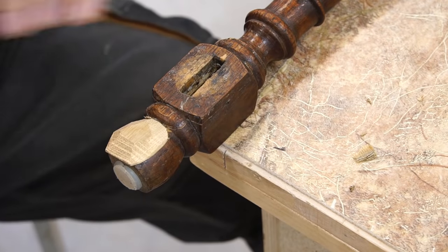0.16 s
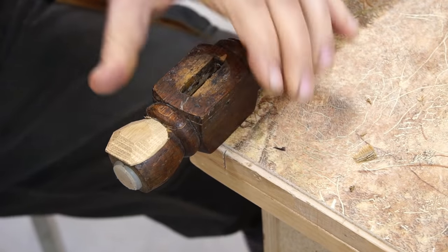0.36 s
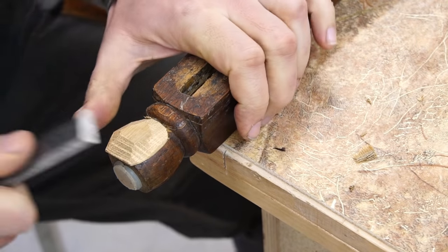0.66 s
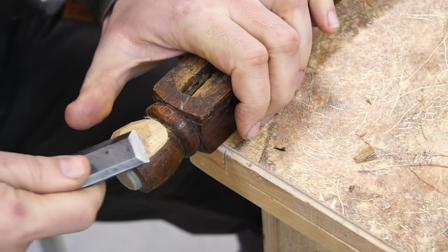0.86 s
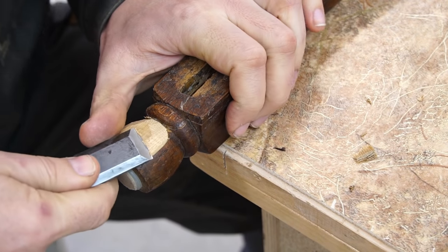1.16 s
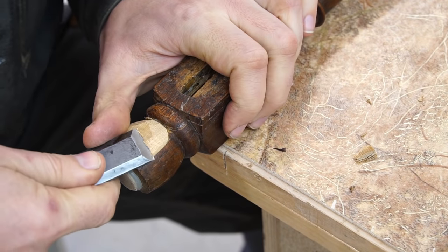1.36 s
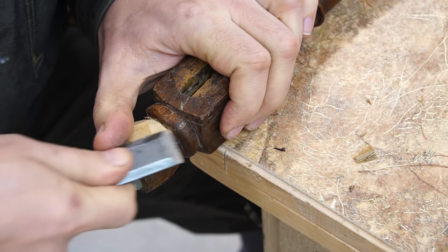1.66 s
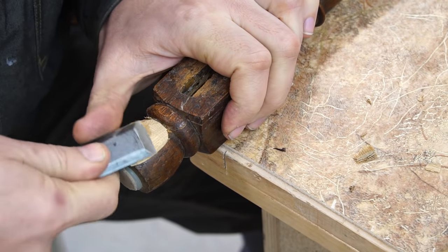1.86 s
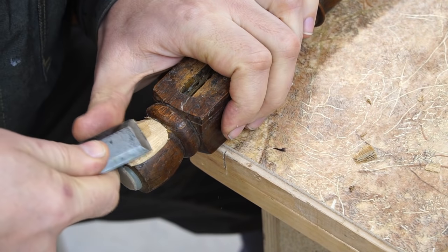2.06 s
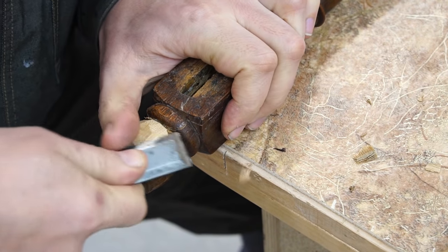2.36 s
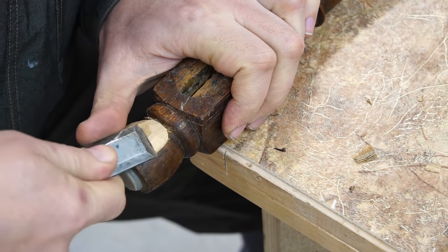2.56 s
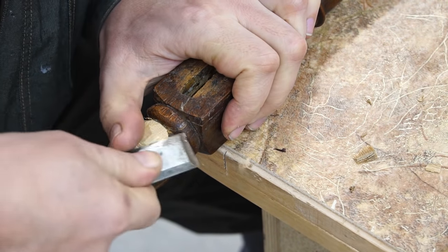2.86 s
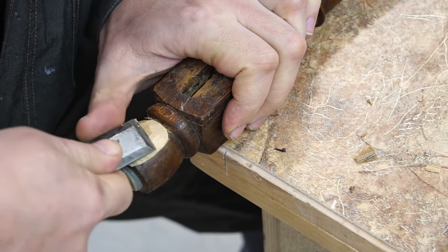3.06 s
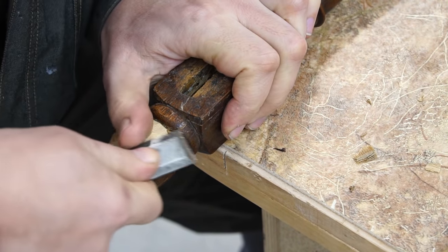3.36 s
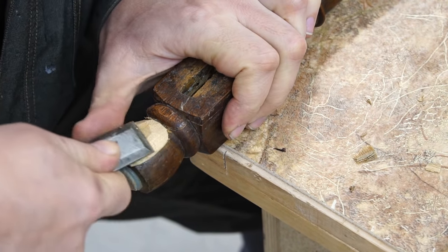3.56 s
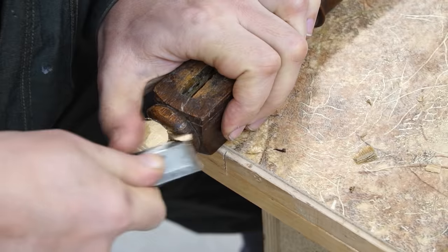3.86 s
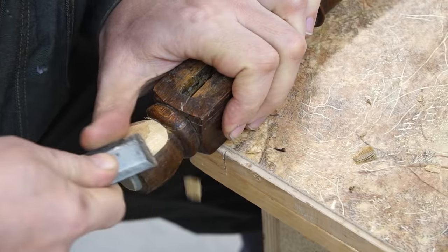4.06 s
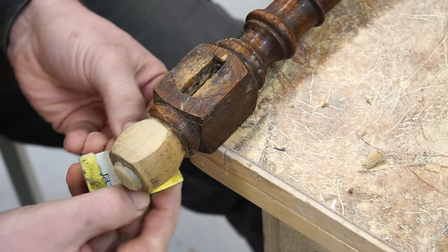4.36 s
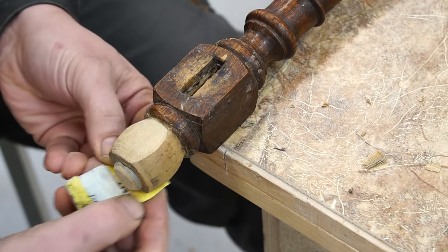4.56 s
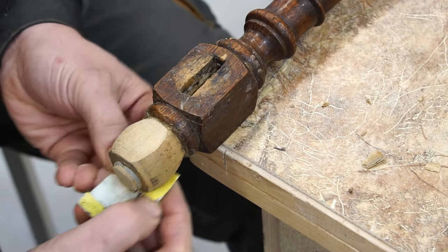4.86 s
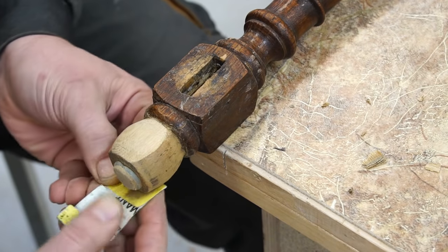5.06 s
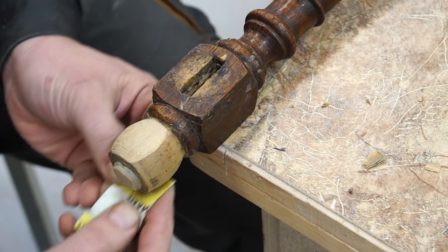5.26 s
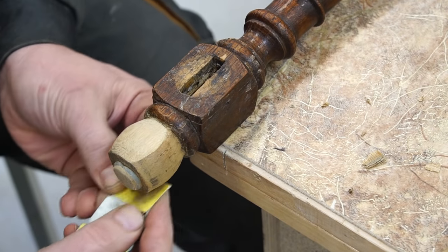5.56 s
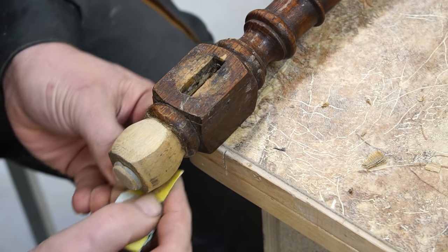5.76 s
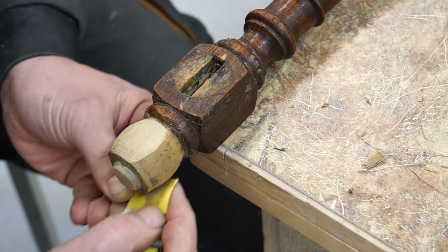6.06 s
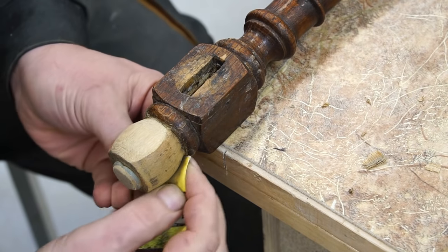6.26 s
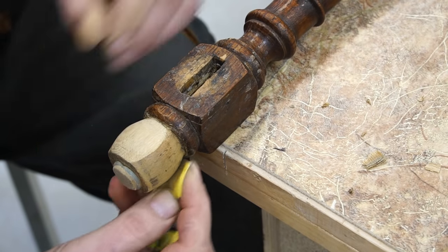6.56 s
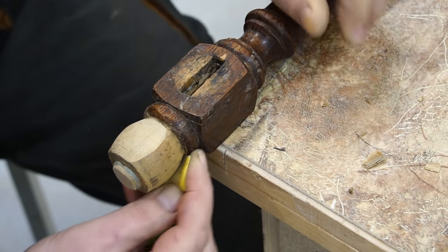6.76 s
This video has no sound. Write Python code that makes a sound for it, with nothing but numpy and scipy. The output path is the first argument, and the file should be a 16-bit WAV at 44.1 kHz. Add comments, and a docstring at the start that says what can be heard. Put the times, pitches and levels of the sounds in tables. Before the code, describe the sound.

A hand slides onto a loose wooden leg, which scuffs and knocks the bench; five crisp chisel pares follow, then quick dry sandpaper strokes.

```python
"""Over quiet workshop air and a faint whine, a hand slides onto a turned chair leg on a bench: a hiss of fine grains.
The loose leg scuffs and taps, then a chisel pares its glued cap in five pushes: torn grains ring wood and steel.
Last, folded sandpaper rubs to and fro: grains follow its speed. Short bright snaps and clicks are quick tones,
knocks are noise bursts through ringing modes, and the bench shudders low. Echoes and a fading tail make the room.
"""
import sys
import numpy as np
from scipy import signal
from scipy.fft import rfft, irfft, next_fast_len
from scipy.io import wavfile
from scipy.ndimage import uniform_filter1d

SR = 44100
rng = np.random.default_rng(int(sys.argv[2]) if len(sys.argv) > 2 else 0)


def waveform_to_disk(signal):
    """Save audio, clipped to [-1, 1], as 16-bit WAV at the path in sys.argv[1]."""
    frames = np.transpose(np.atleast_2d(signal))
    scaled = np.clip(frames, -1, 1) * 32767
    samples = np.round(scaled).astype(np.int16)
    wavfile.write(sys.argv[1], SR, samples)


N = 305613  # length [samples]

# Rise and fall times in these tables are for a change of 20 dB, except the rise of a snap.
# Most colours and all modes set proportions only; the flutter and tail colours also set loudness.
# Hand, leg, chisel and paper are later mixed TRIM_DB lower.

# faint tone that swells and fades: (loudest at [s], rise [s, sign ignored], fall [s], level [dB])
WHINE = (1, -2, 14.5, -67)
# colour of the workshop air: (frequency [Hz], level [dB])
AIR_COLOUR = [(30, -37), (130, -21), (280, -24), (400, -20.5), (520, -11), (1000, -4.5), (1500, -7),
              (2500, -11), (5000, -20), (8000, -22), (11400, -24.5)]
# hand sliding over cloth and wood: (touches at [s], fastest at [s], rise [s], fall [s], level [dB],
# roundness [1-3], centre of the rustle when fastest [Hz], centre one fall time later [Hz])
SLIDES = [(0, -0.007, .1, 0.38, -58, 1.14, 5930, 2680), (0.222, 0.445, 0.24, 0.28, -43.5, 1.94, 2770, 1690),
          (4.135, 4.21, 0.36, 0.67, -49.5, 1.8, 1340, 2960)]
# colour of the wide sliding hiss: (frequency [Hz], level [dB])
SLIDE_COLOUR = [(300, -70), (800, -17.5), (1400, 0.5), (2100, -1), (3000, -1.5), (4000, -4), (6000, -9),
                (9000, -12), (11400, -16)]
# shoves that shake the bench: (time [s], level [dB])
SHAKES = [(.36, -83), (.5, -80), (.78, -79), (.94, -51.5), (1.052, -68), (1.6, -60), (1.7, -51.5),
          (2.12, -62), (2.29, -48.5), (2.83, -52), (3.25, -53), (3.38, -63), (3.82, -45), (4.41, -67),
          (4.672, -57.5), (4.94, -72), (5.53, -66), (5.77, -56.5), (5.98, -65), (6.3, -71), (6.57, -59),
          (6.77, -52), (6.89, -52)]
# low modes of the bench top: (frequency [Hz], width [Hz], level [dB])
BENCH_MODES = [(87, 11, -2), (140.2, 5.6, 0), (214, 41, -8)]
# loose leg shifting under the grip: (strongest at [s], rise [s], fall [s], level [dB], hiss re that level [dB])
SHIFTS = [(.685, 0.022, 0.079, -66, -7), (.84, 0.18, 0.21, -50.5, -12), (0.935, 0.0023, 0.017, -28.5, -46),
          (.99, 0.05, .13, -42.5, -33), (1.085, 0.033, 0.19, -48.5, -12.5)]
# modes of the loose leg: (frequency [Hz], width [Hz], level [dB])
LOOSE_MODES = [(220, 96, -20), (292, 94, -5.5), (383, 27, -5.5), (485, 87, -9.5), (735, 51, -4.5),
               (857, 45, 1), (1043, 82, 8), (1061, 45, 8), (1145, 64, 4.5), (1370, 36, -4),
               (1500, 130, -6.5), (1990, 100, -7.5), (2150, 33, -4.5), (2290, 380, -1.5), (3054, 63, -10.5),
               (3190, 170, -9)]
# loose leg tapping the bench: (time [s], peak [dB])
BUMPS = [(0.932, -28), (0.966, -44), (1.073, -37), (1.443, -57)]
# short bright snaps and clicks of leg, shavings and paper: (time [s], level of the main tone [dB], pitch [Hz],
# overtone [Hz], overtone re main tone [dB], bright crack re main tone [dB], time to the peak [s])
SNAPS = [(1.075, -53, 3260, 5700, -11, -15, 0.00032), (1.443, -52, 2000, 3300, -11, -19, .0004),
         (1.572, -35.5, 2420, 5540, -10, -8, 0.00019), (1.579, -38, 2480, 4300, -7, 2, 0.00045),
         (2.212, -38, 2700, 4700, -10, 2, 0.00026), (2.269, -32, 1960, 3640, 4, -4, 0.00023),
         (4.269, -38, 2540, 6900, -15, -4, 0.00013), (4.559, -21, 2440, 9540, -13, -7.5, 0.00041),
         (4.7779, -39, 2400, 7300, -6, 7, 0.00045), (4.7824, -14.5, 2410, 4170, -5, -10.5, 0.00039),
         (4.882, -28.5, 1780, 2350, -3, -12, 0.00038), (5.829, -38.5, 2430, 5800, 3, 3, 0.00045),
         (5.877, -31.5, 2570, 3480, 0.5, 8, 0.0005), (5.9345, -26, 3430, 1930, -3, -1, 0.00013),
         (5.939, -35, 1880, 2800, -1, -7, 0.0012), (6.057, -39, 4470, 8000, -2, 1, .00023),
         (6.754, -32.5, 2050, 5080, 4.5, 6, 0.0013)]
# chisel pushes, levels before the drives below: (shaving breaks free at [s], jolt [dB], rise of the jolt [s],
# cutting before it [s], cutting [dB], rise of the cut [s], run-out [dB], fall of the run-out [s],
# blade drawn back after [s], drawing back [dB], centre of the rung leg modes under full grip [Hz])
PUSHES = [(1.574, -47, 0.008, .004, -61, 0.008, -57, 0.54, 0.37, -58.5, 650),
          (2.269, -45, 0.011, 0.15, -53.5, 0.017, -48.5, 0.24, 0.21, -76, 595),
          (2.807, -52, 0.016, 0.057, -50.5, 0.037, -53, 0.34, 0.27, -54.5, 646),
          (3.302, -50, 0.013, 0.035, -47.5, 0.048, -51.5, .35, 0.19, -56, 643),
          (3.864, -41.5, 0.064, 0.061, -47, 0.037, -54, 0.57, 0.33, -92, 590)]
# colour of the cutting edge and of the leg's fine hiss: (frequency [Hz], level [dB])
EDGE_COLOUR = [(1200, -75), (2600, 5), (3300, 2.5), (4500, 1), (5700, -2.5), (8000, -5), (10300, -6.5),
               (11400, -11.5)]
# modes of the steel blade: (frequency [Hz], width [Hz], level [dB])
BLADE_MODES = [(2430, 120, -13), (3300, 27, 7), (3310, 62, 9.5), (3660, 29, 5.5), (4320, 40, 6),
               (4640, 160, 2.5), (5700, 100, -26), (5520, 69, 5.5), (7070, 260, 4)]
# modes of the leg on the bench: (frequency [Hz], width [Hz], level [dB])
LEG_MODES = [(219, 61, 1), (365.2, 37, 6), (470, 16, -6.5), (546.3, 32.5, 5.5), (615.4, 15, -2.5),
             (693, 25, 8.5), (753, 122, 6), (882, 61, 8), (1024, 94, 8.5), (1076, 59, 9.5), (1178, 19, 7.5)]
# modes of the leg's small cap: (frequency [Hz], width [Hz], level [dB])
CAP_MODES = [(1366, 29, 0), (1458, 68, 1.5), (1612, 91, 7.5), (1787, 8, 7.5), (2020, 108, 8.5),
             (2111, 75, 10.5), (2190, 190, 13.5), (2568, 78, 7.5), (2714, 440, 7.5), (2710, 140, -10)]
# knocks of the held leg: (time [s], peak [dB], centre of the rung modes [Hz], reach [octaves], chatter [s])
KNOCKS = [(1.578, -44, 2280, 0.49, 0.0054), (1.744, -44.5, 2030, 0.5, .002),
          (2.268, -38.5, 560, 0.077, 0.0038), (2.81, -30.5, 650, 0.14, 0.0066),
          (3.3, -42.5, 620, 0.75, 0.027), (3.864, -35, 360, .06, 0.031), (4.884, -37, 577, .104, 0.012),
          (5.935, -36.5, 536, 0.2, 0.023), (6.87, -41.5, 1080, 0.83, 0.0076)]
# sanding strokes: (start [s], place of top speed [0-1, held to .1-.9], peakedness [held to .2-4],
# grit hiss [dB], cap re hiss [dB], dip at the turn before [dB, scaled for each layer], paper resonance [Hz])
STROKES = [(4.289, 0.6, 2.9, -33.5, -0.5, -11.5, 7400), (4.436, .14, 1.5, -37.5, -5, -8.5, 6940),
           (4.584, 0.46, 2.3, -35, -3.5, -8, 6200), (4.704, 0.19, 1.1, -40.5, -3, -7.5, 3520),
           (4.831, 0.54, 0.38, -39.5, -2.5, -6, 9100), (4.975, 0.33, 0.53, -41, -5, -11, 6900),
           (5.084, 0.7, 1.2, -41.5, -6.5, -4, 6540), (5.244, .29, 0.88, -42.5, -5, -8.5, 8600),
           (5.387, .36, 0.64, -43.5, -2, -7.5, 8140), (5.529, .38, 0.61, -45, -1, -6.5, 5900),
           (5.664, 0.33, 0.56, -43.5, -4, -10.5, 8500), (5.786, 0.5, 0.44, -43.5, -2.5, -10, 6340),
           (5.914, 0.46, .7, -41, -3, -8, 9800), (6.042, 0.58, .89, -44, 0.5, -6.5, 4440),
           (6.159, 0.26, 0.63, -40, -3, -10.5, 4900), (6.322, 0.6, 0.16, -45.5, -2.5, -11, 3940),
           (6.447, 0.18, 0.72, -44, -0.5, -5.5, 5360), (6.577, 0.23, 1.3, -43.5, -5.5, -7.5, 6100),
           (6.689, 0.49, 1.3, -41, -9, -7, 4500), (6.811, .35, 0.78, -39.5, -9.5, -8.5, 5350)]
# colour of the sanding hiss: (frequency [Hz], level [dB])
GRIT_COLOUR = [(1200, -26), (2600, -5.5), (3860, -9.5), (5130, -8), (6900, -9.5), (8700, -9.5),
               (10700, -12.5), (11400, -21.5)]
# treble of the late, fluttering copy: (frequency [Hz], level [dB])
FLUTTER_COLOUR = [(500, -26), (2000, -4.5), (4000, -5.5), (7000, -4.5), (11000, -4)]
# echoes from bench and walls: (delay [s], level [dB])
ECHOES = [(.0021, -13), (.0047, -10), (.0063, -7.5), (0.0092, -21), (0.0188, -16), (.023, -89)]
# how long the room tail takes to fade by 60 dB: (frequency [Hz], time [s])
FADE_TIMES = [(150, 0.66), (1000, 0.25), (3000, 0.51), (10000, 0.18)]
# room tail compared with direct sound: (frequency [Hz], level [dB])
TAIL_COLOUR = [(100, 6.5), (500, 3), (2000, -6), (6000, -5), (11000, -33)]
# likeness of the tail in the two channels: (frequency [Hz], likeness [0-1])
LIKENESS = [(60, 0.6), (170, 0.85), (500, 0.91), (1400, 0.7), (4000, 0), (11000, .05)]
# left minus right while paring: (frequency [Hz], difference [dB])
LEAN_CHISEL = [(60, 12), (170, 2.5), (500, -1.5), (1420, -2.5), (4090, -2.5), (11800, 1)]
# left minus right while sanding: (frequency [Hz], difference [dB])
LEAN_PAPER = [(60, -0.5), (170, 0.5), (500, -1.5), (1420, -3.5), (4090, -0.5), (11800, 1.0)]

TRIM_DB = -3
AIR_DB, WHINE_HZ = -62, 1210
TOUCH_S = 0.019  # how long the hand takes to make contact
WIDENING = 0.12  # the wide hiss follows the speed more steeply than the rustle
SHAKE_RISE_S, SHAKE_FALL_S = 0.091, 0.22
BITE_S, JOLT_FALL_S, DRAW_S = 0.067, 0.047, 0.14  # times for a change of 20 dB
# how strongly each stage drives each layer: (biting [dB], cutting [dB], jolt [dB], run-out [dB], drawing back [dB])
DRIVE_CAP = (-6.5, 6, -0.7, 5, 2.3)
DRIVE_EDGE = (-8.5, -6.5, -5, -0.5, -7.5)
DRIVE_LEG = (-19, 3, -8, 3, -12.5)
DRIVE_STEEL = (-10.5, -6, -10, -20, -7)
REST_HZ, GRIP_S, RELAX_S = 954, 0.22, 0.66  # a firmer grip lowers the centre of the rung leg modes
OTHER_MODES_DB = -21.5  # what a knock adds to every mode, near or far
USUAL_DB = -42  # hiss of a usual stroke
SANDED_LEG_DB, LEG_PER_DB, SANDED_LEG_HZ = -52.5, 0.52, 824  # the leg follows the strokes only in part
PAPER_DB, PAPER_DB_PER_OCTAVE = -9.5, -6.5  # paper resonance at 6 kHz; weaker when higher
LOW_CUT_HZ, TOP_HZ = 227, 11080


def amp(db):
    """Turns decibels into a gain."""
    return 10 ** (np.asarray(db) / 20)


def evened(x):
    """Scales a sound to an average (rms) strength of 1."""
    return x / np.sqrt(np.mean(x ** 2) + 1e-20)


def read(points, hz):
    """Reads a curve between its points, on a logarithmic frequency scale."""
    f, value = np.transpose(points)
    return np.interp(np.log(hz + 1), np.log(f + 1), value)


def add(mix, s, sound):
    """Adds a short sound to the mix, starting at s seconds."""
    part = mix[round(s * SR):][:len(sound)]
    part += sound[:len(part)]


def shaped(x, points, share=1):
    """Filters a sound by a colour in dB, multiplied by share."""
    size = next_fast_len(x.shape[-1])
    gain = amp(share * read(points, np.fft.rfftfreq(size, 1 / SR)))
    return irfft(rfft(x, size) * gain, size)[..., :x.shape[-1]]


def swell(top, rise, fall, db, bend=1.):
    """Gain over time: db at top, 20 dB less rise s before and fall s after; bend 1 is pointed, 2 is round."""
    t = np.arange(N) / SR - top
    return amp(db - 20 * np.where(t < 0, -t / abs(rise), t / abs(fall)) ** bend)


def ring(modes, weights=1):
    """The answer of each mode to one tap, neighbours in opposite phase; energy 1 in all."""
    hz, width, db = np.transpose(modes)[..., None]
    t = np.arange(4096) / SR
    sign = (-1.) ** np.arange(len(modes))[:, None]
    decay = np.exp(-np.pi * width * t)  # wide modes die sooner
    out = sign * weights * amp(db) * np.sqrt(width) * decay * np.sin(2 * np.pi * hz * t)
    return out / np.linalg.norm(out)


def near(hz, centre_hz, reach, rest_db):
    """Weight of a mode at hz when the wood is touched where it favours centre_hz."""
    return np.exp(-.5 * (np.log2(hz / centre_hz) / reach) ** 2) + amp(rest_db)


def resonate(x, hz, width):
    """A moving resonance: shifts the curve hz down to zero, smooths twice and shifts back; rms 1."""
    turn = np.exp(2j * np.pi * np.cumsum(hz) / SR)
    r = np.exp(-np.pi * width / SR)
    smooth = signal.lfilter([1], [1, -2 * r, r * r], x / turn)
    return evened((turn * smooth).real)


def grains(per_s, spread_db, clump_db):
    """Fibres tearing or surfaces rubbing: random clicks of uneven size, in clumps of a few ms."""
    clumps = amp(clump_db * evened(uniform_filter1d(rng.standard_normal(N), size=200)))
    size = amp(spread_db * np.minimum(rng.exponential(1, N), 5)) * rng.standard_normal(N)
    return evened(clumps * size * (rng.random(N) < per_s / SR))


def floor():
    """Quiet workshop air, partly alike left and right, and a faint whine that swells and fades."""
    a, b = rng.standard_normal((2, N))
    air = amp(AIR_DB) * evened(shaped(np.array([a, 0.13 * a + 0.84 * b]), AIR_COLOUR))
    whine = np.sqrt(2) * np.sin(2 * np.pi * WHINE_HZ * np.arange(N) / SR)
    return air + swell(*WHINE, bend=1.2) * whine


def hand():
    """Skin and sleeve dragging: a smooth, fine hiss and a rustle whose centre drifts."""
    drag, t = grains(per_s=25000, spread_db=-2.3, clump_db=-1.0), np.arange(N) / SR
    glide = []
    for _, top, _, fall, _, _, hz, end_hz in SLIDES:
        glide += [(top, hz), (top + fall, end_hz)]
    wide = evened(shaped(drag, SLIDE_COLOUR))
    # the same grains backwards, so the rustle is a separate noise
    rustle = amp(-6.0) * resonate(drag[::-1], np.interp(t, *np.transpose(glide)), width=590)
    out = np.zeros(N)
    for touch, top, rise, fall, db, bend, _, _ in SLIDES:
        speed = swell(top, rise, fall, 0, bend)
        contact = np.clip((t - touch) / TOUCH_S + .5, 0, 1)
        out += contact * amp(db) * speed * (speed ** WIDENING * wide + rustle)
    return out


def bench():
    """Low uneven shudder of the bench top: sparse clicks ring its modes at each shove."""
    shake = sum(swell(s, SHAKE_RISE_S, SHAKE_FALL_S, db) for s, db in SHAKES)
    clicks = grains(per_s=93, spread_db=-6.5, clump_db=3.5)
    return signal.oaconvolve(shake * clicks, ring(BENCH_MODES).sum(0))[:N]


def loose_leg():
    """The leg scuffs and taps the bench while the hand takes hold; both ring its loose modes."""
    scuff = grains(per_s=3400, spread_db=0.5, clump_db=-2.5)
    moves = np.array([swell(*row[:4], bend=1.97) for row in SHIFTS])
    tap = ring(LOOSE_MODES).sum(0)
    out = signal.oaconvolve(moves.sum(0) * scuff, tap)[:N]
    for s, db in BUMPS:
        add(out, s, amp(db) * tap / abs(tap).max())
    hiss_gain = amp(np.array(SHIFTS)[:, 4]) @ moves
    return out + hiss_gain * evened(shaped(scuff[::-1], EDGE_COLOUR))


def snaps():
    """Short bright snaps and clicks: a few quick cycles with an overtone and a bright crack."""
    out, t = np.zeros(N), np.arange(900) / SR
    noises = rng.standard_normal((len(SNAPS), 900))
    for (s, db, hz, over_hz, over_db, crack_db, rise), noise in zip(SNAPS, noises):
        body = np.sin(2 * np.pi * hz * t) + amp(over_db) * np.sin(2 * np.pi * over_hz * t)
        crack = amp(crack_db) * np.diff(noise, prepend=0) / np.sqrt(2)
        add(out, s, amp(db) * (body + crack) * t / rise * np.exp(1 - t / rise))
    return out


def push(free, jolt_db, jolt_rise, cutting, cut_db, rise, run_db, run_out, back, back_db, gripped_hz):
    """The five stages of one push as gains, and how far the grip lowers the leg modes."""
    bite = free - cutting
    biting = swell(bite, 2 * rise, BITE_S, cut_db)
    # rises to the bite, holds until the shaving breaks free, then falls
    held = swell(free, np.inf, JOLT_FALL_S, cut_db)
    cut = np.where(np.arange(N) / SR < bite, swell(bite, rise, 1, cut_db), held)
    jolt = swell(free, jolt_rise, JOLT_FALL_S, jolt_db)
    running_out = swell(free, jolt_rise, run_out, run_db)
    drawing_back = swell(free + back, DRAW_S, DRAW_S, back_db, bend=0.5)
    lowered_hz = (REST_HZ - gripped_hz) * swell(free + 0.027, GRIP_S, RELAX_S, 0, bend=2.73)
    return np.array([biting, cut, jolt, running_out, drawing_back, lowered_hz])


def wood(tear, cap, leg, centre_hz):
    """The tearing rings the cap, and those modes of the leg that the grip leaves free."""
    out = signal.oaconvolve(cap * tear, ring(CAP_MODES).sum(0))[:N]
    for (hz, _, _), mode in zip(LEG_MODES, ring(LEG_MODES)):
        free = near(hz, centre_hz, reach=0.53, rest_db=-6)
        out += signal.oaconvolve(leg * tear * free, mode)[:N]
    # a slim leg radiates little bass
    return signal.sosfilt(signal.butter(2, 240, "high", fs=SR, output="sos"), out)


def chisel():
    """The edge shears the wood while it is pushed: hiss, ringing steel and ringing wood."""
    tear = grains(per_s=9000, spread_db=2.0, clump_db=-0.5)
    *stages, lowered_hz = sum(push(*row) for row in PUSHES)
    drives = (DRIVE_CAP, DRIVE_EDGE, DRIVE_LEG, DRIVE_STEEL)
    cap, edge, leg, blade = (amp(drive) @ np.array(stages) for drive in drives)
    hiss = edge * evened(shaped(tear * rng.choice([-1, 1], N), EDGE_COLOUR))
    steel = signal.oaconvolve(blade * tear[::-1], ring(BLADE_MODES).sum(0))[:N]
    return hiss + steel + wood(tear, cap, leg, np.maximum(REST_HZ - lowered_hz, 200))


def knocks():
    """A blow rings the modes near its centre and chatters on for a moment."""
    out, t = np.zeros(N), np.arange(4096) / SR
    modes = LEG_MODES + CAP_MODES + BLADE_MODES
    mode_hz = np.array(modes)[:, :1]
    noises = rng.standard_normal((len(KNOCKS), 4096))
    for (s, db, centre_hz, reach, chatter), noise in zip(KNOCKS, noises):
        modal = ring(modes, near(mode_hz, centre_hz, reach, OTHER_MODES_DB)).sum(0)
        sound = signal.fftconvolve(noise * np.exp(-t / chatter), modal)
        add(out, s, amp(db) * sound / abs(sound).max())
    return out


def sandpaper():
    """Each stroke speeds up, slows and turns; the hiss follows the speed, the wood less so."""
    start, top, peaked, hiss_db, cap_db, dip_db, paper_hz = np.transpose(STROKES)
    t, turns = np.arange(N) / SR, np.append(start, 6.96)  # the last turn [s]
    k = np.clip(np.searchsorted(turns, t) - 1, 0, len(start) - 1)  # stroke under way
    u = np.clip((t - turns[k]) / np.diff(turns)[k], 0, 1)  # progress through it
    p = np.clip(top[k], .1, .9)
    arc = np.sin(np.pi / 2 * np.where(u < p, u / p, (1 - u) / (1 - p)))
    speed = arc ** np.clip(peaked[k], .2, 4)
    next_dip_db = np.append(dip_db[1:], dip_db[-1])
    dip = np.where(u < p, dip_db[k], next_dip_db[k]) * (1 - speed)
    leg_db = SANDED_LEG_DB + LEG_PER_DB * (hiss_db[k] - USUAL_DB)
    layers = ((hiss_db[k], 1.8), (hiss_db[k] + cap_db[k], 1.5), (leg_db, .9))  # level, share of the dip
    touching = t > turns[0]
    hiss, cap, leg = (uniform_filter1d(touching * amp(db + share * dip), size=300) for db, share in layers)
    tear = grains(per_s=14000, spread_db=1.5, clump_db=0.96)
    grit = evened(shaped(tear * rng.choice([-1, 1], N), GRIT_COLOUR))
    paper_gain = amp(PAPER_DB + PAPER_DB_PER_OCTAVE * np.log2(paper_hz[k] / 6000))
    paper = paper_gain * resonate(tear, paper_hz[k], width=710)
    return hiss * (grit + paper) + wood(tear, cap, leg, SANDED_LEG_HZ)


def fluttering(x):
    """Treble spread wide: a late copy flutters at random in strength and sign, separately left and right."""
    flutter = uniform_filter1d(uniform_filter1d(rng.standard_normal((2, N)), size=150), size=150)
    return evened(flutter) * shaped(np.roll(x, 40), FLUTTER_COLOUR)  # about 1 ms late


def room(x):
    """Single echoes, then sparse taps dying band by band; the bass is more alike in both channels."""
    taps = np.zeros((2, SR))
    at = np.arange(500, SR - 20, 20) + rng.integers(0, 20, (2, (SR - 501) // 20))
    np.put_along_axis(taps, at, rng.choice([-1., 1.], at.shape), 1)
    hz, t, (a, b) = signal.stft(taps, SR, nperseg=256)
    same = np.clip(read(LIKENESS, hz), 0, 1)[:, None]
    fade = amp(-60 * t / read(FADE_TIMES, hz)[:, None])
    z = np.array([a, same * a + np.sqrt(1 - same ** 2) * b]) * fade
    z /= np.sqrt((abs(z) ** 2).sum(2, keepdims=True) if z.ndim < 3 else (abs(z) ** 2).sum(2, keepdims=True))
    tail = signal.istft(z, SR, nperseg=256)[1]
    tail = shaped(tail / np.linalg.norm(tail[0]), TAIL_COLOUR)
    # each echo comes a few samples apart left and right
    for (s, db), skew in zip(ECHOES, rng.integers(-5, 6, (len(ECHOES), 2))):
        tail[[0, 1], round(s * SR) + skew] += amp(db)
    return signal.fftconvolve(x[None], tail, axes=1)[:, :N]


def moving(x, count):
    """Hands and tools keep moving, so the sound takes turns between several paths through the room."""
    turn = 2 * np.pi * (3.1 * np.arange(N) / SR + np.arange(count)[:, None] / (2 * count))
    shares = np.sqrt(2 / count) * abs(np.sin(turn))  # their squares add up to 1
    return x + fluttering(x) + sum(room(x * share) for share in shares)


def leaned(x, lean):
    """Shares the level between left and right by frequency."""
    return np.array([shaped(x[0], lean, .5), shaped(x[1], lean, -.5)])


def scene():
    """Puts the work into the room, leans it left or right, and adds bench and air."""
    rubbing = amp(TRIM_DB) * (hand() + loose_leg() + chisel() + sandpaper())
    work = moving(rubbing + knocks() + snaps(), count=3)
    paring = np.arange(N) < 4.13 * SR
    placed = np.where(paring, leaned(work, LEAN_CHISEL), leaned(work, LEAN_PAPER))
    return placed + bench() + floor()


def record(dry):
    """The microphone drops the bass; a steep filter then removes the top treble."""
    thin = signal.sosfilt(signal.butter(3, LOW_CUT_HZ, "high", fs=SR, output="sos"), dry)
    low_pass = signal.firwin(1023, TOP_HZ, window=("kaiser", 7), fs=SR)
    return signal.oaconvolve(thin, low_pass[None], "same")


dry = scene()
out = record(dry)
waveform_to_disk(out)
```